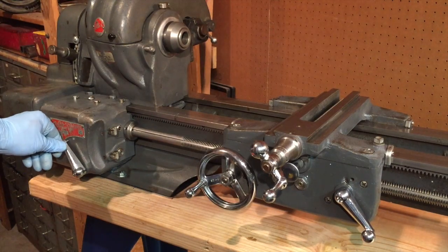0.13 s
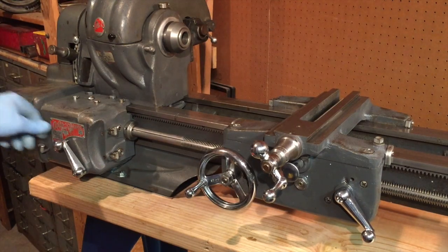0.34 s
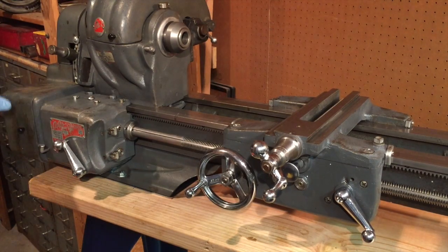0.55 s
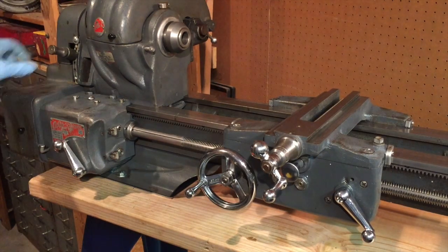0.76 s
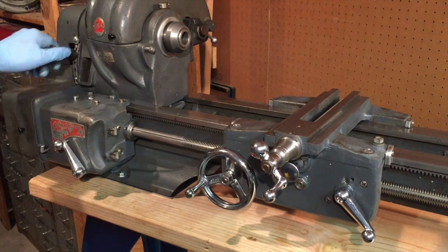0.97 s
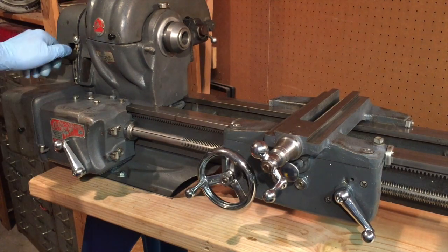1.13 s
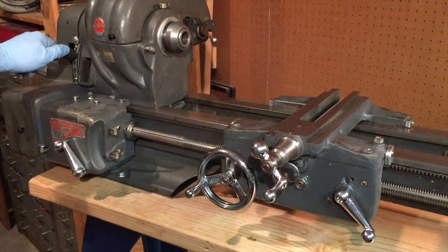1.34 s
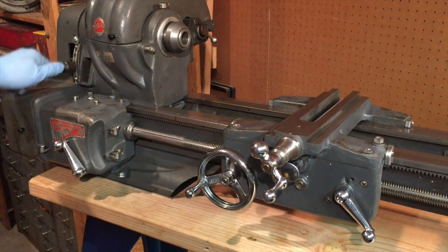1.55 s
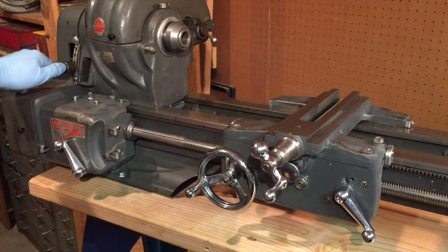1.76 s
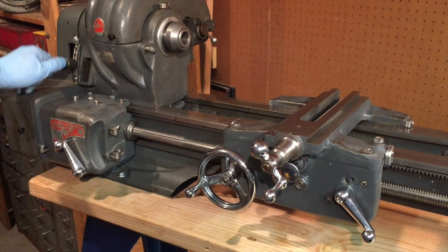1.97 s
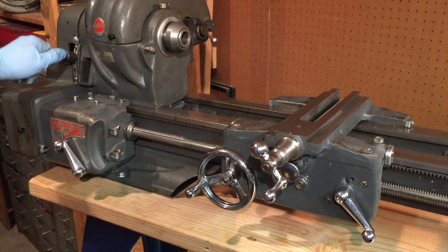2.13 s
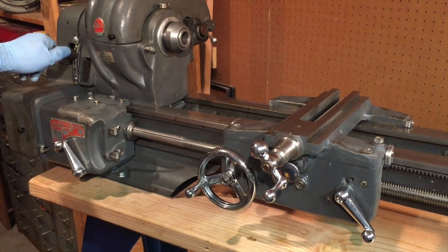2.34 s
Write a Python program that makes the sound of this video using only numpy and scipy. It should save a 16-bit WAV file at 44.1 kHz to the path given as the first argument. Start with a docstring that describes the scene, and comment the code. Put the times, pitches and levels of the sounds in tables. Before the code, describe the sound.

Hard iron clunks of a lathe lever being shifted, following a faint metallic ring and light cloth and rubber rustling; a scrape, a pause, then a brief clacking answer. Small workshop, low room noise, one mono microphone.

```python
"""A faint ring, a rustle reaching up, then a scrape and hard clunks with a sharp snap and a brief answer.
Place: a small workshop, where a hand shifts the levers of a bench lathe. Microphone: one, in mono.
Distance is heard only through levels and the short tail of machine and room; no path is computed.
Iron rings as dying sines and noise bands; sleeve, glove and scrape are random clicks, filtered and
swelled; the hand's bumps and the lever's judders are short low tones; shaped noise is the quiet."""
import sys
import numpy as np
from scipy import signal
from scipy.fft import rfft, irfft
from scipy.io import wavfile
from scipy.ndimage import uniform_filter1d

SR = 44100
rng = np.random.default_rng(int(sys.argv[2]) if len(sys.argv) > 2 else 0)


def dump_mix(stems):
    """Bounce the given channels to the path in sys.argv[1] as a 16-bit WAV at rate SR."""
    frames = np.atleast_2d(stems).T  # one column per channel
    limited = np.clip(frames, -1, 1)  # hard clip at full scale
    pcm = np.round(limited * 32767).astype(np.int16)
    wavfile.write(sys.argv[1], SR, pcm)


N = 105840  # samples, 2.4 s


def amp(db):
    """Decibels to gain."""
    return 10 ** (np.asarray(db) / 20)


def unit(x):
    """Scales to rms 1."""
    return x / np.sqrt(np.mean(x ** 2) + 1e-20)


def read(points, hz):
    """Reads a table on a log-frequency axis."""
    f, value = np.transpose(points)
    return np.interp(np.log(hz + 1), np.log(f + 1), value)


def add(mix, start_s, sound):
    """Mixes a sound in at a time, cut at the end of the mix."""
    part = mix[max(round(start_s * SR), 0):][:len(sound)]
    part += sound[:len(part)]


def coloured(x, spectrum):
    """Filters a signal by a spectrum and scales it to rms 1."""
    gain = amp(read(spectrum, np.fft.rfftfreq(len(x), 1 / SR)))
    return unit(irfft(rfft(x) * gain, len(x)))


def uneven(x, db):
    """A random gain, without extreme peaks, with a new value at each unit of x."""
    level = np.minimum(rng.standard_normal(2000), 1.2)
    return amp(db * np.interp(x, np.arange(2000), level))


def grains(per_s, spread_db):
    """Random clicks of uneven size and sign, at rms 1."""
    size = amp(spread_db * np.minimum(rng.exponential(1, N), 4))
    sign = rng.choice([-1, 1], N)
    happens = rng.random(N) < per_s / SR
    return unit(size * sign * happens)


def rising(x, rise_s):
    """Softens the start of a sound with a straight ramp."""
    return x * np.minimum(np.arange(len(x)) / SR / max(rise_s, 1e-4), 1)


def swell(peak_s, rise_s, fall_s):
    """A rounded (Gaussian) rise to a peak and an exponential dying away."""
    t = np.arange(N) / SR - peak_s
    return np.exp(-np.where(t < 0, .5 * (t / rise_s) ** 2, t / abs(fall_s)))


BASS_HZ, MID_HZ, TREBLE_HZ = 285, 1300, 4200  # where a contact's bass and treble gains take hold
RIPPLE_TOP_HZ, RIPPLE_TOP_SHARE = 9100, 0.52  # in the top treble the modes merge


def tone(hz, bass_db, treble_db):
    """Gain of a heavier or sharper contact; no treble boost reaches the very top."""
    points = [(BASS_HZ, bass_db), (MID_HZ, 0), (TREBLE_HZ, treble_db), (RIPPLE_TOP_HZ, min(treble_db, 0))]
    return amp(read(points, hz))


STRIKE_SPREAD_DB, BASS_LAG_CYCLES = 1.5, 1.02  # unevenness of strikes; time constant of the build-up
WANDER_RAD, WANDER_PER_S = 0.5, 45  # echoes blur the phase of each ringing mode


def ring(modes, bass_db, treble_db):
    """Dying modes, struck a little differently each time and blurred by echoes."""
    t = np.arange(SR // 2) / SR
    hz, db, t60 = np.transpose(modes)[:, :, None]
    strike_db = db + STRIKE_SPREAD_DB * rng.standard_normal(hz.shape)
    size = amp(strike_db) * tone(hz, bass_db, treble_db)
    steps = rng.standard_normal(size=(len(hz), 100))
    wander = np.array([np.interp(t * WANDER_PER_S, np.arange(len(row)), row) for row in steps])
    swing = np.sin(2 * np.pi * (hz * t + rng.random(hz.shape)) + WANDER_RAD * wander)
    build_up = 1 - np.exp(-t * hz / BASS_LAG_CYCLES)
    dying = np.exp(-np.log(1000) * t / t60)
    return (size * swing * build_up * dying).sum(0)


# The quiet of the workshop: pitch_hz, level_db (per Hz)
QUIET_COLOUR = [(12, -58), (20, -22), (64, -3.5), (129, -11), (219, -11), (259, -14.5), (452, -15.5),
                (725, -21.5), (1870, -21.5), (2760, -23.5), (6020, -27), (15500, -33)]


def quiet():
    """Steady noise with the workshop's spectrum."""
    return amp(-53.5) * coloured(rng.standard_normal(N), QUIET_COLOUR)


# Modes of the first lever: pitch_hz, level_db, t60_s
SETTLE_MODES = [(504, -3, .13), (583, -3.5, 0.12), (1710, -3.5, .11), (2640, -5.5, 0.097), (870, -8, 0.05),
                (3850, -14.5, 0.061)]
SETTLE_S, SETTLE_RISE_S, SETTLE_DB = 0.0011, 0.0027, -34


def first_lever():
    """The first lever settles: a faint ring of its modes with a softened start."""
    out = np.zeros(N)
    add(out, SETTLE_S, amp(SETTLE_DB) * rising(ring(SETTLE_MODES, 0, 0), SETTLE_RISE_S))
    return out


# Strokes of sleeve and glove: peak_s, rise_s, fall_s, hiss_db, body_db
SLEEVE_STROKES = [(.43, 0.017, .08, -60, -61), (.56, 0.027, 0.17, -52, -54), (.606, 0.009, .014, -40, -50),
                  (.63, 0.038, 0.12, -65, -51.5), (0.756, 0.0036, 0.022, -43, -42),
                  (.795, 0.03, 0.051, -40.5, -42), (0.841, 0.008, 0.03, -37.5, -61),
                  (0.876, 0.0097, .012, -42, -42), (0.992, 0.037, 0.08, -37.5, -39.5),
                  (1.059, 0.064, 0.069, -32.5, -44), (1.131, 0.057, 0.049, -44, -33),
                  (1.209, 0.028, 0.041, -46.5, -42), (1.16, .012, 0.022, -50, -40),
                  (1.33, 0.04, 0.092, -50, -48.5), (1.454, .02, 0.048, -41, -34.5),
                  (1.972, 0.008, 0.023, -50.5, -59)]
# Bright hiss of the fibres: pitch_hz, level_db (per Hz)
HISS_COLOUR = [(100, -32), (700, -5), (1500, -7.5), (3000, -4), (6000, 2), (10000, -1.5), (15500, -6.5)]
# Duller body of the cloth: pitch_hz, level_db (per Hz)
CLOTH_COLOUR = [(50, -30), (170, -3.5), (300, -10.5), (550, -5.5), (1400, 1.5), (2600, -1.5), (5000, -11),
                (15000, -35)]
FIBRES_PER_S, FIBRE_SPREAD_DB = 7300, 3.5
CLUMP_DB, CLUMPS_PER_S = 1, 220  # fibres let go in small bunches
FOLD_DB, FOLD_WIDTH_HZ = 3, 130  # the folds colour each stroke differently


def sleeve():
    """Fibres catch and slip in strokes, each with a bright hiss and a duller body."""
    t, hz, out = np.arange(N) / SR, np.fft.rfftfreq(N, 1 / SR), 0
    for peak_s, rise_s, fall_s, hiss_db, body_db in SLEEVE_STROKES:
        hiss = amp(hiss_db) * coloured(grains(FIBRES_PER_S, FIBRE_SPREAD_DB), HISS_COLOUR)
        body = amp(body_db) * coloured(grains(FIBRES_PER_S, FIBRE_SPREAD_DB), CLOTH_COLOUR)
        folds = unit(uneven(hz / FOLD_WIDTH_HZ, FOLD_DB))
        out = out + swell(peak_s, rise_s, fall_s) * irfft(rfft(hiss + body) * folds, N)
    return out * unit(uneven(t * CLUMPS_PER_S, CLUMP_DB))


# Dying away of the machine and room: pitch_hz, t60_s
TAIL_DECAY = [(100, 0.41), (400, 0.31), (1000, 0.27), (2800, 0.27), (7000, 0.2), (15000, 0.21)]
BLOW_SLOPE = 0.11  # the first blow dies faster at higher pitch, as a power of frequency
CROWD_RIPPLE_DB, CROWD_WIDTH_HZ = 3.5, 35  # weaker modes lie about CROWD_WIDTH_HZ apart
CROWD = rng.standard_normal(4000)  # random strengths of the weaker modes, shared by all bursts
PATCHY_DB, PATCH_WIDTH_HZ = 2.5, 130  # each contact favours some groups of modes


def burst(spectrum, bass_db, treble_db, blow_s, tail_db, count=14):
    """Crowded modes: a quick blow and a tail that dies band by band; the bass builds up last."""
    t, hz = np.arange(SR // 2) / SR, np.fft.rfftfreq(SR // 2, 1 / SR)
    crowd = amp(CROWD_RIPPLE_DB * np.interp(hz / CROWD_WIDTH_HZ, np.arange(len(CROWD)), CROWD))
    depth = np.interp(hz, [0, MID_HZ, RIPPLE_TOP_HZ], [0, 1, RIPPLE_TOP_SHARE])
    ripple = (crowd * uneven(hz / PATCH_WIDTH_HZ, PATCHY_DB)) ** depth
    ripple = ripple / np.sqrt(uniform_filter1d(ripple ** 2, size=600))  # keeps the broad spectrum level
    noise = rfft(coloured(rng.standard_normal(len(t)), spectrum))
    noise = noise * tone(hz, bass_db, treble_db) * ripple
    centres, out = np.geomspace(60, 16000, count), 0
    for centre, share in zip(centres, np.eye(count)):
        band = irfft(noise * np.interp(hz, centres, share), len(t))
        blow = np.exp(-t / blow_s * (centre / MID_HZ) ** BLOW_SLOPE)
        tail = amp(tail_db - 60 * t / read(TAIL_DECAY, centre))
        build_up = 1 - np.exp(-t * centre / BASS_LAG_CYCLES)
        out = out + band * np.hypot(blow, tail) * build_up
    return out


# Small metal snaps, mostly of the latch: start_s, level_db, lift_db (of the highest treble)
LATCH_SNAPS = [(0.6072, -38.5, -7), (1.7517, -18, 10), (2.2697, -16.5, -13)]
# Colour of a snap before its lift: pitch_hz, level_db (per Hz)
SNAP_COLOUR = [(100, -40), (2000, -22), (4000, 7.5), (7500, -8), (9600, 3.5), (11500, -9.5), (13500, -6),
               (16000, -12)]
SNAP_BLOW_S, SNAP_TAIL_DB = 0.0076, -6.5  # blow time constant at MID_HZ; tail against blow


def latch():
    """Small metal parts snap with a short bright crack: a burst of crowded modes."""
    out = np.zeros(N)
    for start_s, level_db, lift_db in LATCH_SNAPS:
        # the lift grows from 5000 to 11900 Hz
        colour = [(hz, db + np.interp(hz, [5000, 11900], [0, lift_db])) for hz, db in SNAP_COLOUR]
        add(out, start_s, amp(level_db) * burst(colour, 0, 0, SNAP_BLOW_S, SNAP_TAIL_DB))
    return out


# Glove sticking on metal: peak_s, rise_s, fall_s, pitch_hz, half_width_hz (6 dB down), level_db
GLOVE_RUBS = [(.64, .015, .03, 1480, 150, -51.5), (.757, 0.0043, 0.01, 1380, 220, -35),
              (.785, 0.015, 0.061, 909, 49.4, -43), (1.045, 0.0037, 0.019, 1520, 90, -39),
              (1.128, 0.015, 0.017, 544, 69.6, -38), (1.16, 0.061, 0.051, 734, 49.7, -42.5)]


def glove():
    """Rubber sticks and slips, each rub exciting one resonance."""
    f, out = np.fft.rfftfreq(N, 1 / SR), 0
    for peak_s, rise_s, fall_s, hz, width_hz, db in GLOVE_RUBS:
        resonance = 1 / (1 + 1j * (f - hz) / width_hz) ** 2
        rub = unit(irfft(rfft(grains(FIBRES_PER_S, FIBRE_SPREAD_DB)) * resonance, N))
        out = out + amp(db) * swell(peak_s, rise_s, fall_s) * rub
    return out


def thuds(table):
    """Short low tones, each under a single rounded swell."""
    out = np.zeros(N)
    for start_s, length_s, hz, db in table:
        t = np.arange(0, length_s, 1 / SR)
        rounded = np.sin(np.pi * (t / length_s) ** 0.97)
        low_tone = np.sqrt(2) * np.sin(2 * np.pi * (hz * t + rng.random()))
        add(out, start_s, amp(db) * rounded * low_tone)
    return out


# Soft bumps of the hand on the lever: start_s, length_s, pitch_hz, level_db
HAND_BUMPS = [(1.105, 0.038, 179.5, -47), (1.194, 0.051, 191, -42.5), (1.198, .055, 110, -44.5),
              (1.849, 0.097, 80, -44.5)]


def hand():
    """The hand bumps the lever: soft low swells."""
    return thuds(HAND_BUMPS)


# Colour of a contact with the casting: pitch_hz, level_db (per Hz)
CLUNK_COLOUR = [(40, -23), (100, -13.5), (170, -9), (250, -2), (330, 1.5), (450, -5), (600, -1),
                (950, -3.5), (1350, -1), (1600, -4), (1760, -3), (2000, -6), (2300, -3.5), (2480, -6),
                (2750, -3), (3100, -7), (4200, -8.5), (6000, -18), (8000, -32), (9300, -24), (10500, -35.5),
                (16000, -35)]
# Modes of the casting: pitch_hz, level_db, t60_s
IRON_MODES = [(234, -15.5, 0.23), (331.3, -3, 0.22), (490, -5.5, 0.093), (553.5, -4.5, 0.35),
              (733, -5, 0.31), (898, -6, 0.24), (1316, -4, .2), (1477, 0.5, 0.069), (1760, 2, 0.13),
              (2175, -6, 0.14), (2344, -8.5, 0.22), (2645, -8.5, 0.16), (2913, -11.5, 0.18),
              (3467, -1, 0.12)]
BLOW_S, TAIL_DB = 0.011, -3.5  # blow time constant at MID_HZ; tail against blow


def casting(bass_db, treble_db):
    """The lathe's answer to one contact: crowded weak modes and the ringing strong ones."""
    crowded = burst(CLUNK_COLOUR, bass_db, treble_db, BLOW_S, TAIL_DB)
    return crowded + 0.5 * amp(-4) * ring(IRON_MODES, bass_db, treble_db)


# The lever dragging along its gate: time_s, level_db
DRAG_LEVEL = [(1.569, -37), (1.595, -25), (1.66, -33), (1.71, -29), (1.768, -29.5), (1.825, -23),
              (1.87, -28.5), (1.905, -46), (1.93, -70)]
SLIPS_PER_S, SLIP_SPREAD_DB, DRAG_TREBLE_DB = 500, 3, -6.5


def scrape():
    """Tiny slips of the dragged lever shake the casting."""
    level_db = np.interp(np.arange(N) / SR, *np.transpose(DRAG_LEVEL), left=-200, right=-200)
    slips = grains(SLIPS_PER_S, SLIP_SPREAD_DB) * amp(level_db)
    body = casting(0, DRAG_TREBLE_DB)
    return signal.fftconvolve(slips, body / np.linalg.norm(body))[:N]


# Knocks of the second lever: start_s, level_db, bass_db, treble_db, ring_db (on top of LEVER_DB), rise_s
LEVER_KNOCKS = [(1.580, -30, 2, 0, -7, 0.0032), (1.593, -23, 0, 3, -22, 0.00087),
                (1.5981, -23, 4.5, 2, -7.5, 0.00058), (1.647, -21.5, 4, -2.5, -20, 0.00056),
                (1.681, -30, 7, 6, -6, .001), (1.692, -35.5, -2, -1, -7, 0.00092),
                (1.725, -33.5, 9.5, -2.5, 4, 0.0013), (1.7511, -25, -1, 0, -18, 0.0011),
                (1.792, -20.5, -28, 3.5, -7, 0.0039), (1.8393, -14.5, 0.5, 1.5, -17, 0.00035),
                (1.850, -11.5, -2.5, -28, -36, 0.0011), (2.058, -26, 6.5, -17.5, -18, 0.011),
                (2.074, -32, 4.5, -34, -15, 0.0021), (2.118, -61, 6, -33, -31, .003),
                (2.2492, -30, -9, -10, -4.5, 0.00046), (2.261, -27.5, -11, -8, 0.5, 0.0011),
                (2.2704, -22.5, -10, 7.5, 0, 0.00032), (2.281, -22.5, 2, 4.5, -9, 0.0011),
                (2.315, -19.5, -6.5, -6, -9.5, 0.0019)]
# Modes of the lever: pitch_hz, level_db, t60_s
LEVER_MODES = [(968, -2, 0.2), (1059, 0, 0.45), (1230, -8, 0.16), (1754, 5.5, 0.12), (1906, -11, .2),
               (3843, 1, 0.07), (4090, -15.5, 0.34), (4010, -16, 0.4), (4760, -7, 0.06)]
LEVER_DB = -2


def second_lever():
    """The second lever knocks in its gate, ringing itself and the casting."""
    out = np.zeros(N)
    for start_s, level_db, bass_db, treble_db, ring_db, rise_s in LEVER_KNOCKS:
        lever = amp(LEVER_DB + ring_db) * ring(LEVER_MODES, 0, treble_db)
        knock = casting(bass_db, treble_db) + lever
        add(out, start_s, amp(level_db) * rising(knock, rise_s))
    return out


# Low judder of the sticking lever: start_s, length_s, pitch_hz, level_db
LEVER_JUDDERS = [(1.711, 0.058, 335.3, -29), (2.05, 0.068, 332, -36)]


def judder():
    """The lever judders as it sticks: short low swells."""
    return thuds(LEVER_JUDDERS)


def scene():
    """Levers, glove and sleeve over the quiet of the workshop."""
    cloth_and_hand = sleeve() + glove() + hand()
    metal = first_lever() + latch() + scrape() + second_lever() + judder()
    return (quiet() + cloth_and_hand + metal)[None]


def record(dry):
    """The recorder's band limit: a low-pass at 15600 Hz."""
    low_pass = signal.firwin(401, 15600, window=("kaiser", 8), fs=SR)
    return signal.oaconvolve(dry, low_pass[None], "same")


dry = scene()
out = record(dry)
dump_mix(out)
```